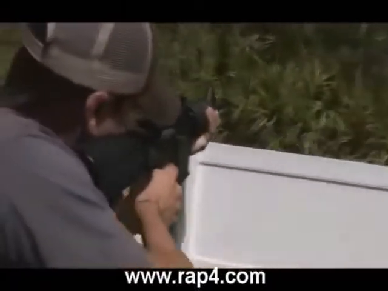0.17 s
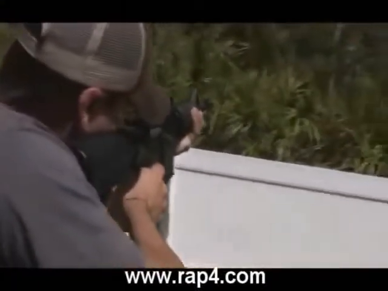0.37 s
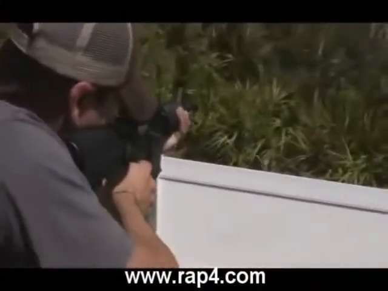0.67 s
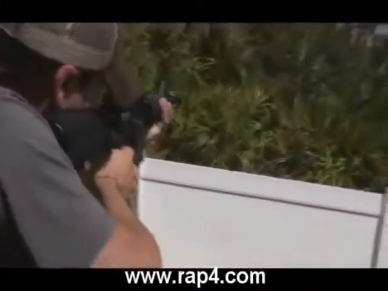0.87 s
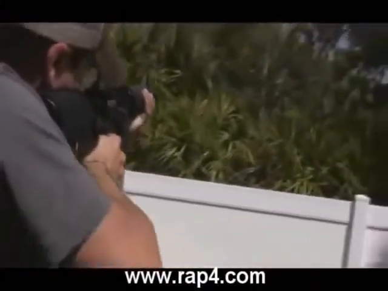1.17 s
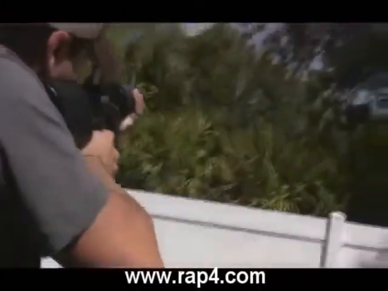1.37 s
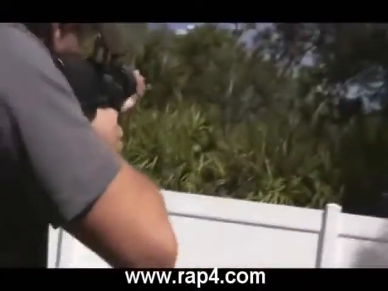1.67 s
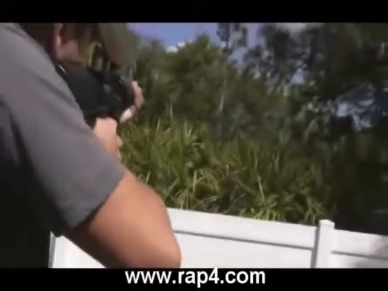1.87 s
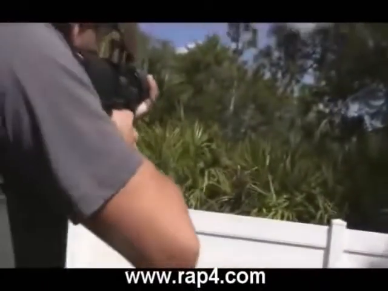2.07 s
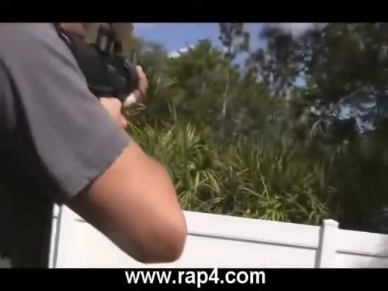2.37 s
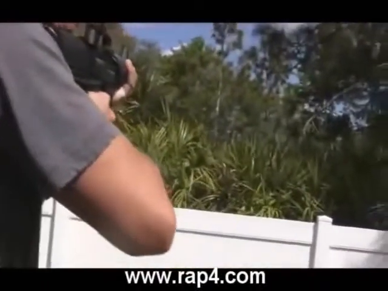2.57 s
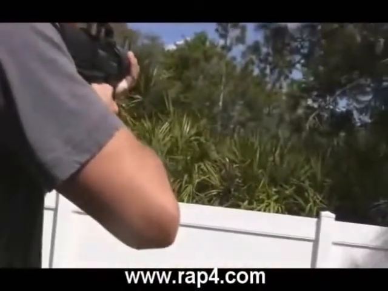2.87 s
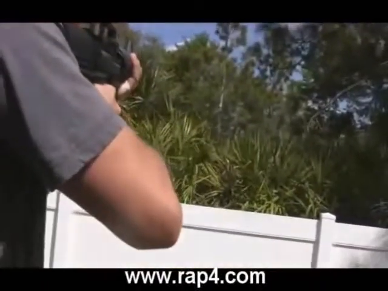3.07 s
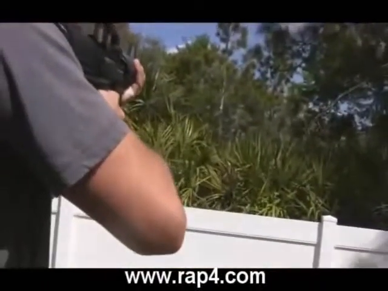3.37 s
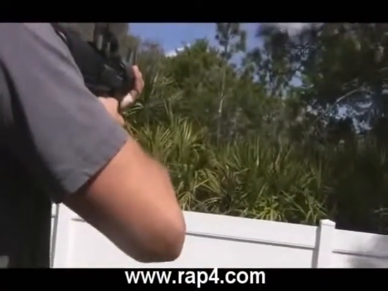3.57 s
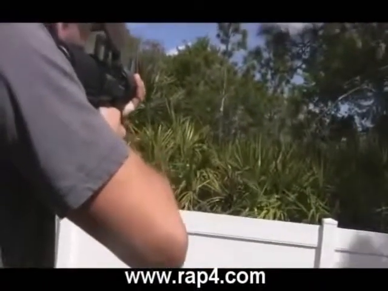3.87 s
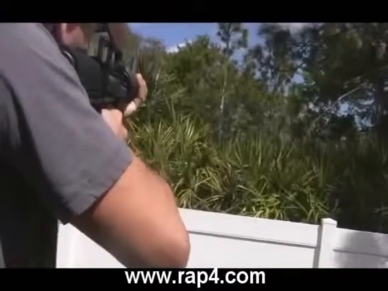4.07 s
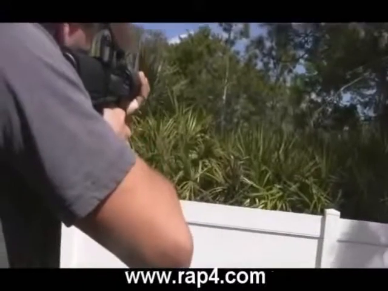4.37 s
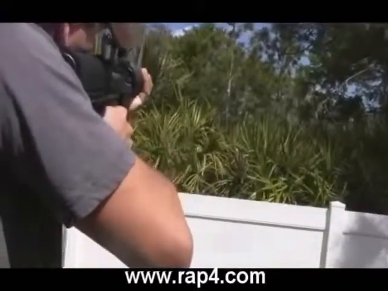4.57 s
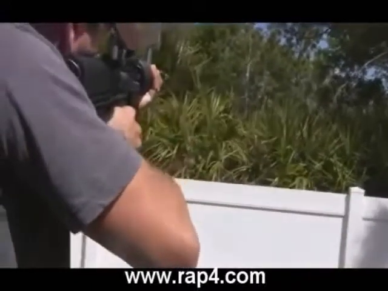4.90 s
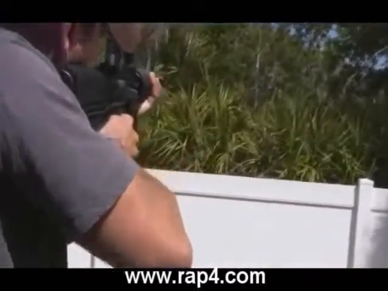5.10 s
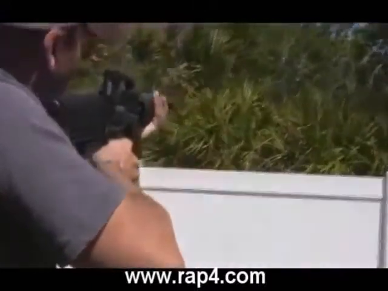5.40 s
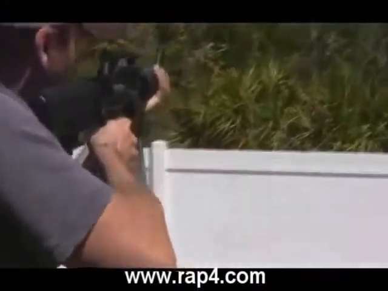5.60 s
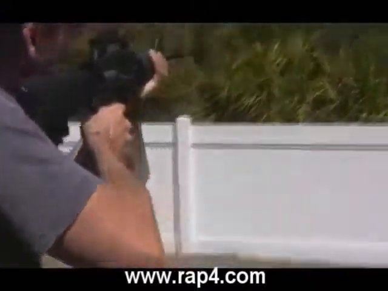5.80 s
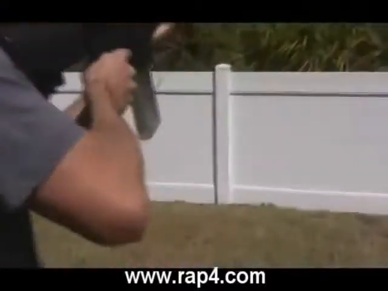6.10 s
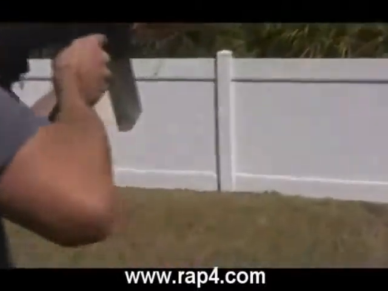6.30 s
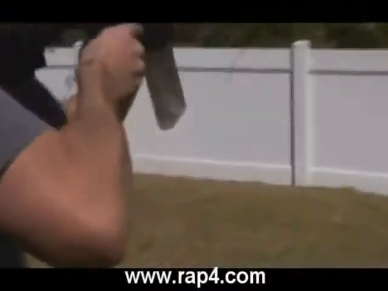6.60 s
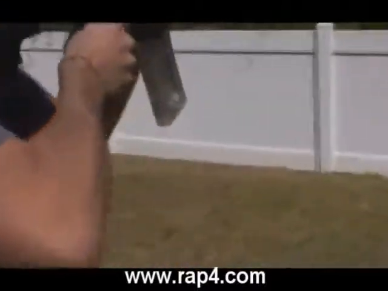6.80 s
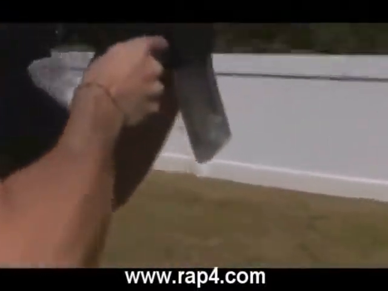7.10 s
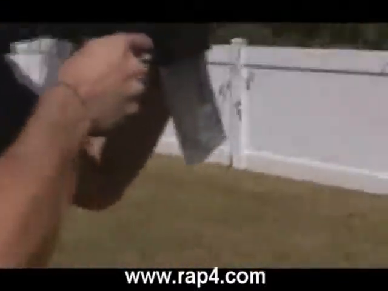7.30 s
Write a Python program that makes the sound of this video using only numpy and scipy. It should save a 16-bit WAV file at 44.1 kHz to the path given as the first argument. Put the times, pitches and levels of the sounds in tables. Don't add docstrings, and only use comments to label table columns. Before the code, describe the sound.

Seven spaced single shots from a compressed-air paintball gun crack and puff close by in a yard, with rough wind buffeting the microphone.

```python
import sys
import numpy as np
from scipy import signal
from scipy.io import wavfile
from scipy.ndimage import uniform_filter1d

SR = 44100
rng = np.random.default_rng(int(sys.argv[2]) if len(sys.argv) > 2 else 0)


def store_pcm(level_fs):
    pcm = np.round(np.clip(level_fs, -1, 1) * 32767).astype(np.int16)
    wavfile.write(sys.argv[1], SR, np.atleast_2d(pcm).T)


def decibels_to_gain(level_db):
    exponent = np.asarray(level_db, float) / 20
    return 10 ** exponent


N = 328545


def evened(x):
    return x / np.sqrt(np.mean(x ** 2) + 1e-20)


def add(mix, s, sound):
    part = mix[round(s * SR):][:len(sound)]
    part += sound[:len(part)]


def colour(x, spectrum):
    hz, db = np.transpose(spectrum)
    grid_hz = abs(np.fft.fftfreq(4096, 1 / SR))
    log_gain = np.interp(np.log(grid_hz + 1), np.log(hz + 1), db) * np.log(10) / 20
    taps = np.fft.ifft(np.exp(np.conj(signal.hilbert(log_gain)))).real[:2048]
    taps = taps.reshape((1,) * (x.ndim - 1) + (-1,))
    return signal.oaconvolve(x, taps, axes=-1)[..., :x.shape[-1]]


def swell(t, rise, t60):
    climb = np.exp(np.minimum(t, 0) / max(rise, 1e-4))
    decay = decibels_to_gain(-60 * np.maximum(t, 0) / t60)
    return np.where(t < 0, climb, decay)


def metal(x):
    # f/Hz, width/Hz, level/dB
    body_modes = [(2130, 130, -16.5), (3960, 930, 0.5), (4630, 1500, -1.5), (6600, 600, -5),
                  (9360, 600, -13)]
    t = np.arange(400) / SR
    ring = 0
    for hz, width, db in body_modes:
        ring = ring + decibels_to_gain(db) * width * np.exp(-np.pi * width * t) * np.sin(2 * np.pi * hz * t)
    return evened(signal.oaconvolve(x, ring)[:len(x)])


def clack(db, spectrum, ring, t60):
    t = np.arange(2000) / SR - 10e-3
    noise = rng.standard_normal(len(t))
    hit = evened(colour(noise, spectrum)) + ring * metal(noise)
    return decibels_to_gain(db) * hit * swell(t, .001, t60)


def thump(t):
    u = (t - .0146) * 190
    out = -decibels_to_gain(-11) * np.cos(2 * np.pi * u) * np.exp(-(u / .7) ** 2)
    for k in range(7):
        u = (t - .0100 - .0025 * k) * 620
        strength = decibels_to_gain(-2.5 * (2 - k)) if k <= 2 else decibels_to_gain(-7 - 3 * (k - 2))
        out -= strength * np.cos(2 * np.pi * u) * np.exp(-(u / .7) ** 2)
    return out


def echoes(t):
    # f/Hz, level/dB
    fence_spectrum = [(88, -36.5), (150, -2), (209, -7.5), (476, -1.5), (593, -11), (781, 1), (973, -12.5),
                      (1050, -2.5), (1280, -12), (2570, -5), (3450, -13.5), (9630, -18), (12000, -21.5),
                      (15600, -44.5), (22000, -120)]
    # f/Hz, level/dB
    trees_spectrum = [(180, -18), (300, -14), (539, -24), (831, 6.5), (985, -9.5), (1080, -2.5),
                      (2270, 4.5), (3710, -1), (4400, 0), (12000, -14), (15600, -48.5), (22000, -120)]
    n = len(t)
    grains = decibels_to_gain(2.0 * rng.exponential(1, n)) * (rng.random(n) < .3) * rng.standard_normal(n)
    lumps = decibels_to_gain(2.0 * evened(uniform_filter1d(rng.standard_normal(n), size=300)))
    slap = decibels_to_gain(1.5) * swell(t - .0402, 0.0005, .016)
    scatter = lumps * swell(t - .0415, 0.0021, 0.62) * swell(t - .11, 1.0, 1.0)
    near = evened(colour(grains, fence_spectrum)) * (slap + scatter)
    panel = signal.lfilter(*signal.iirpeak(770, 4.0, SR), rng.standard_normal(n))
    drum = evened(panel) * swell(t - .065, 0.011, 0.24) * swell(t - .09, 0.75, 0.23)
    far = evened(colour(rng.standard_normal(n), trees_spectrum)) * swell(t - .13, 0.084, 0.77)
    return near + decibels_to_gain(-2.0) * drum + decibels_to_gain(-7.0) * far


def muzzle(t, thump_db):
    hz = 4150 * (1 + 0.071 * rng.uniform(-1, 1))
    ring = decibels_to_gain(5 + .7 * thump_db) * np.sin(2 * np.pi * hz * t) * swell(t - .0134, .0008, .014)
    since_crack = t - 0.014
    crack = decibels_to_gain(3) * np.sin(2 * np.pi * 2040 * since_crack) * swell(since_crack, 0.00021, 0.0073)
    return ring + crack


def gun():
    # sear clack t/s, clack level/dB, blast hiss level/dB, barrel thump level/dB, yard echo level/dB
    shots = [
        (0.879, -10, -10, -14.5, -26.5),
        (1.7209, 9.5, -7, -0.5, -19.5),
        (2.644, 6.5, -5, -0.5, -19),
        (4.0606, 7.5, -6, 1, -18.5),
        (4.8782, -2, -7, -5.5, -23.5),
        (6.8588, -1, -7, -17.5, -29),
        (7.182, -2, -8.5, -36, -31.5),
    ]
    # t/s, level/dB
    resets = [(1.056, -12.5), (1.8929, -6), (2.773, -6), (4.2267, -5.5), (5.027, -11.5), (6.992, -11),
              (7.3155, -15)]
    # t/s, level/dB, t60/s
    splats = [
        (2.204, -45.5, .15),
        (4.19, -27.5, 0.0065),
        (4.2056, -17.5, 0.003),
    ]
    # delay/s, level/dB, rise/s, t60/s
    action = [
        (.003, -16, .002, .12),
        (.0132, 0, .0011, .011),
        (.0185, -7, .0007, .012),
        (.0215, -9, .0006, .012),
        (.026, -17, .0006, .01),
        (.028, -21, .004, .12),
    ]
    # f/Hz, level/dB
    clack_spectrum = [(290, -52.5), (500, -12.5), (1250, -3), (3670, -7), (5400, -6.5), (7140, -2.5),
                      (8380, -11.5), (12000, -12), (15600, -29), (22000, -120)]
    # f/Hz, level/dB
    gas_spectrum = [(530, -8.5), (900, -8.5), (1510, -12.5), (2240, -8), (3530, -21), (4150, -17.5),
                    (5320, -20), (6330, -13), (12000, -26), (15600, -14), (22000, -120)]
    # f/Hz, level/dB
    reset_spectrum = [(500, -14.5), (1200, -2.5), (2500, -9.5), (3900, 2), (4900, 0.5), (5900, -23.5),
                      (7000, -1), (9800, -15), (12000, -25)]
    out, t = np.zeros(N), np.arange(SR) / SR
    for s, clack_db, blast_db, thump_db, echo_db in shots:
        add(out, s - 19 / 2000, clack(clack_db - 20.5, clack_spectrum, 0.73, 0.038))
        noise = rng.standard_normal(len(t))
        gas = evened(colour(noise, gas_spectrum)) + .6 * metal(noise)
        flow = sum(decibels_to_gain(db) * swell(t - delay, rise, t60) for delay, db, rise, t60 in action)
        blast = decibels_to_gain(blast_db) * (gas * flow + muzzle(t, thump_db))
        add(out, s, blast + decibels_to_gain(thump_db) * thump(t) + decibels_to_gain(echo_db) * echoes(t))
    for s, db in resets:
        add(out, s - .008, clack(db - 7.5, reset_spectrum, 0.54, 0.028))
    for s, db, t60 in splats:
        add(out, s - 10e-3, clack(db, clack_spectrum, .3, t60))
    return out


def force(column=1):
    # t/s, force level/dB, tumble level/dB
    wind_course = [(0, -44, 3), (.6, -40.5, -10.5), (.635, -16, 0), (1.24, -12.5, -3), (1.4, -18.5, 0),
                   (1.68, -50.5, -5), (2.3, -38, -1.5), (2.62, -53, -4), (3.3, -61, -3), (4.45, -56, 17),
                   (4.72, -28.5, 3), (4.9, -20, -6), (5.2, -7, -1), (5.45, -11.5, 3.5), (6.3, -5, -0.5),
                   (6.45, -12, -2.5), (7.0, -10.5, -2.5), (7.12, 6, 0)]
    rows = np.transpose(wind_course)
    return np.interp(np.arange(N) / SR, rows[0], rows[column])


def camera_gain():
    duck_from_db, duck_share, recover_db_per_s, duck_s = -29, 0.87, 26.5, 0.059
    climb = np.arange(N) / SR * recover_db_per_s
    over_db = duck_share * np.maximum(force() - duck_from_db, 0)
    held_db = np.maximum.accumulate(over_db + climb) - climb
    lag = np.exp(-1 / (duck_s * SR))
    return -signal.lfilter([1 - lag], [1, -lag], held_db)


def wind():
    # centre t/s, level/dB, half width/s, sharpness/dB
    puffs = [(0.005, 12, 0.014, -3), (.215, 11, .04, -4), (.652, 14, 0.016, 7.5), (.79, 3.5, 0.081, -5.5),
             (.96, -3.5, 0.019, 0), (1.345, -9, 0.079, -9), (1.41, 3.5, .02, -2), (1.461, 7, 0.0088, -4),
             (1.66, 15, .03, 4), (1.953, 13, 0.013, 0), (2.07, 8, 0.023, 0), (2.225, 11, 0.016, -2),
             (2.29, 8, 0.018, 4), (2.86, 12.5, 0.074, 0), (2.98, 9, 0.027, 2), (3.095, 14, 0.034, 9),
             (4.81, 3.5, 0.056, -3), (5.07, 1.5, 0.025, -19), (5.225, 2, 0.09, 6.5), (5.402, -13, 0.011, 6),
             (5.464, -18, 0.017, -4), (5.512, 7.5, 0.055, 7), (6.029, -8.5, 0.0092, 5),
             (6.073, 3, 0.032, -0.5), (6.14, -3.5, 0.011, 3.5), (6.311, 4.5, 0.056, 4),
             (6.399, -7, 0.018, 2), (6.55, -8, 0.013, -4), (6.922, -5, 0.033, -2.5),
             (7.042, -9.5, 0.07, -9)]
    # t/s, level over the wind/dB
    eddies = [(0.169, 4.5), (0.208, -5.5), (0.638, -6), (.665, 8), (0.769, 3.5), (.827, 5), (1.057, 10),
              (1.258, 3.5), (1.36, 13.5), (2.128, 4.5), (2.342, 7), (4.749, 8), (4.851, 6), (5.06, 3),
              (5.218, 7.5), (5.292, 5), (5.339, 4.5), (5.427, 1.5), (5.486, -3.5), (5.591, 3.5),
              (5.719, 2.5), (5.829, -2), (5.989, 3.5), (6.06, 3.5), (6.099, -1), (6.579, 1.5), (6.7, 2),
              (6.738, 2), (6.759, 0), (7.083, 6)]
    # t/s, level/dB
    lean_course = [(0, 0), (1, -1.5), (1.7, 0), (4.6, -1), (5.5, -2.5), (6.3, -2), (6.8, -.5)]
    # f/Hz, level/dB
    deep_spectrum = [(15, -30.5), (35, -7.5), (70, 5), (100, 13), (160, -37.5), (400, -52)]
    # f/Hz, level/dB
    rumble_spectrum = [(50, -19.5), (110, -3), (170, -1.5), (250, -4.5), (400, -22), (1000, -67)]
    # f/Hz, level/dB
    buffet_spectrum = [(100, -55.5), (220, -2.5), (330, 10), (500, 4.5), (800, -6), (1400, -20.5),
                       (2500, -57)]
    # f/Hz, level/dB
    crackle_spectrum = [(300, -7), (700, 1), (1500, -6.5), (2500, -16), (4000, -25.5), (5500, -32),
                        (7300, -46), (12000, -69)]
    t = np.arange(N) / SR
    force_db, tumble_db = force(), force(column=2)
    puff_db, sharp_db = 0, 5.5
    for at, db, half, sharpness_db in puffs:
        bump = np.exp(-((t - at) / half) ** 2)
        puff_db = puff_db + db * bump
        sharp_db = sharp_db + sharpness_db * bump
    rumble_db = force_db + puff_db
    deep_db = np.minimum(force_db + 2, -30.5) + puff_db
    buffet_db = rumble_db - 3.5 + tumble_db - 1.4 * np.maximum(-19 - rumble_db, 0)

    slow_noise = uniform_filter1d(uniform_filter1d(rng.standard_normal((2, N)), 500), 500)
    lumps_db = 2.0 * evened(slow_noise)
    pops = rng.standard_normal((3, N)) * decibels_to_gain(3 * np.minimum(rng.exponential(1, (3, N)), 4))
    pops = pops * (rng.random((3, N)) < 2500 / SR)
    for at, db in eddies:
        pops[:, round(at * SR) + 60] += decibels_to_gain(15.5 + db) * np.array([.6, -1, .5])
        lumps_db = lumps_db + db * swell(t - at - .002, 0.00028, 0.45)
    own = pops[:2] * decibels_to_gain(lumps_db)
    shared = pops[2] * decibels_to_gain(lumps_db.mean(0))

    deep = evened(colour(own + 5.0 * shared, deep_spectrum))
    rumble = evened(colour(own + 2.17 * shared, rumble_spectrum))
    buffet = evened(colour(own + 0.66 * shared, buffet_spectrum))
    small = own * abs(pops[:2]) ** .25 * decibels_to_gain(.6 * lumps_db)
    crackle = evened(colour(small - 0.043 * small[::-1], crackle_spectrum))
    near = decibels_to_gain(rumble_db - 0.5 - 0.65 * tumble_db) * rumble
    near = near + decibels_to_gain(buffet_db + 4.5) * (buffet + decibels_to_gain(sharp_db - 15.0) * crackle)
    lean = decibels_to_gain(np.outer([.5, -.5], np.interp(t, *np.transpose(lean_course))))
    return decibels_to_gain(camera_gain()) * (decibels_to_gain(deep_db) * deep + lean * near)


def snaps():
    # t/s, peak level/dB
    snap_times = [(.642, -12), (.767, -21), (.827, -19.5), (4.753, -28), (4.853, -22), (5.219, -23),
                  (5.295, -19), (5.338, -16), (5.487, -16), (5.989, -22), (6.01, -24.5), (6.579, -23.5),
                  (6.702, -24), (6.739, -23.5), (6.76, -24), (7.084, -25)]
    # f/Hz, level/dB
    snap_spectrum = [(200, -21), (500, 7), (1200, 0), (2500, -12.5), (4500, -26.5), (8000, -41),
                     (12000, -59)]
    out, t = np.zeros((2, N)), np.arange(2000) / SR
    likeness, t60 = 0.75, 0.023
    for s, db in snap_times:
        left, other = rng.standard_normal((2, len(t)))
        right = likeness * left + (1 - likeness) * other
        pop = colour(np.array([left, right]) * decibels_to_gain(-60 * t / t60), snap_spectrum)
        add(out.T, s, decibels_to_gain(db) * pop.T / abs(pop).max())
    return out


def yard():
    # f/Hz, level/dB
    yard_spectrum = [(18, -54.5), (30, -8), (279, -1), (317, 0.5), (377, 0.5), (461, 2), (497, 0.5),
                     (689, 1), (954, -2), (1420, -4.5), (2470, -9), (4510, -12), (12000, -22), (15600, -41),
                     (22000, -120)]
    hiss = evened(colour(rng.standard_normal(N), yard_spectrum))
    open_db = 1.5
    return decibels_to_gain(-41 + open_db + camera_gain()) * hiss


def scene():
    # f/Hz, level/dB
    width_spectrum = [(300, -55.5), (1100, -21), (2200, -21), (3600, -6), (4600, -30), (8000, -21.5)]
    mid = gun() + yard()
    scatter = rng.standard_normal(600) * decibels_to_gain(-40 * np.arange(600) / 600)
    scatter = scatter / np.linalg.norm(scatter)
    side = colour(signal.oaconvolve(mid, scatter)[:N], width_spectrum)
    return np.array([mid + side, mid - side]) + wind() + snaps()


def starve(x):
    # f/Hz, level/dB
    starve_floor = [(1500, -80), (3500, -69), (6000, -67), (11400, -67), (11900, -50)]
    mid_side = np.array([x[0] + x[1], x[0] - x[1]]) / 2
    hz, t, z = signal.stft(mid_side, SR, nperseg=1024)
    power = uniform_filter1d(abs(z) ** 2, size=3, axis=2)
    loud_db = 10 * np.log10(abs(uniform_filter1d(power.sum((0, 1)), size=9)) + 1e-20)
    power_db = 10 * np.log10(abs(uniform_filter1d(power, size=3, axis=1)) + 1e-20)
    whim = rng.standard_normal((len(t), len(hz))).T
    whim = uniform_filter1d(uniform_filter1d(whim, size=4, axis=0), size=5, axis=1)
    whim_db = 4 * evened(whim)
    floor_db = np.interp(hz, *np.transpose(starve_floor))[:, None]
    keep = power_db > loud_db + floor_db + whim_db
    keep[1] &= power_db[1] > uniform_filter1d(power_db[0], size=9, axis=0) - 13 + whim_db
    keep[1, hz > 4100] &= (whim_db[0] > 3)
    spell_db = uniform_filter1d(camera_gain(), size=2 * SR)[np.minimum((t * SR).astype(int), N - 1)]
    keep[:, hz > 11550] &= spell_db > -11
    mid, side = signal.istft(z * keep, SR, nperseg=1024)[1][:, :N]
    return np.array([mid + side, mid - side])


def top_cut(x):
    return signal.sosfilt(signal.butter(12, 12190, fs=SR, output="sos"), x)


def record(dry):
    taps = signal.firwin(401, 12200, window=("kaiser", 9), fs=SR)
    limited = signal.oaconvolve(np.clip(dry, -.97, .97), taps[None], "same")
    finished = np.clip(starve(limited), -1, 1)
    return top_cut(finished)


dry = scene()
out = record(dry)
store_pcm(out)
```